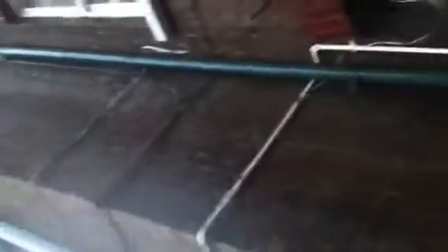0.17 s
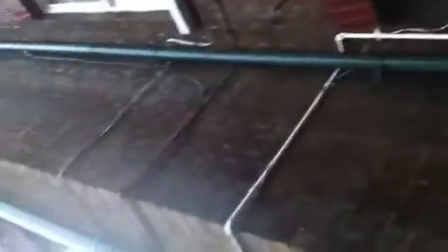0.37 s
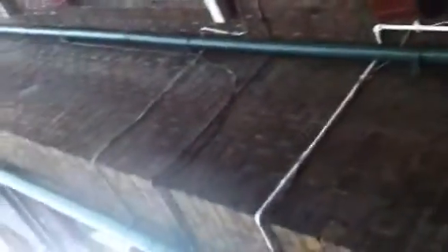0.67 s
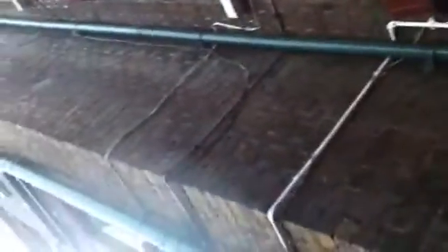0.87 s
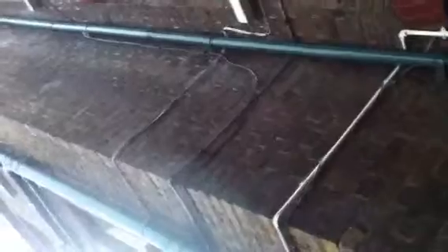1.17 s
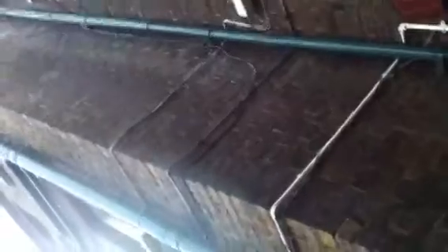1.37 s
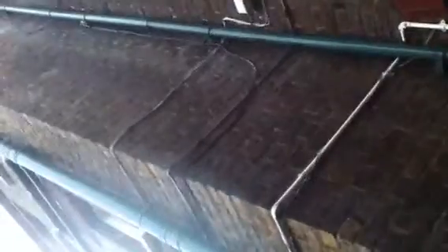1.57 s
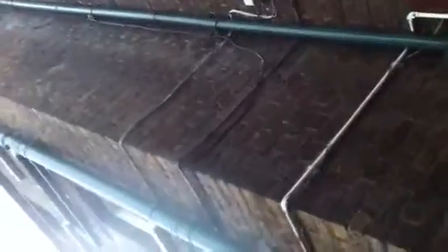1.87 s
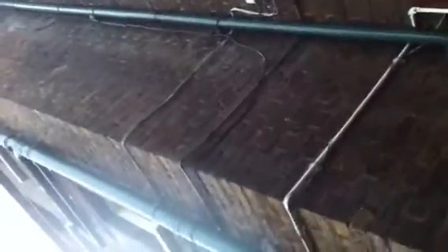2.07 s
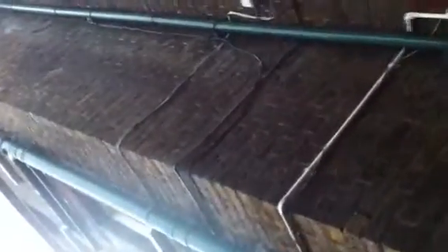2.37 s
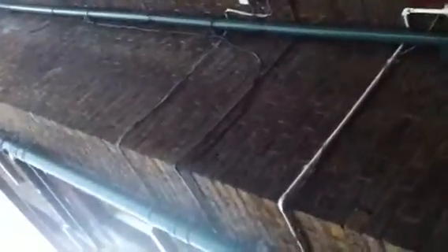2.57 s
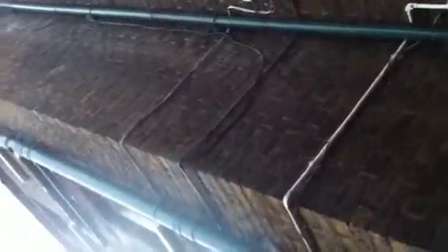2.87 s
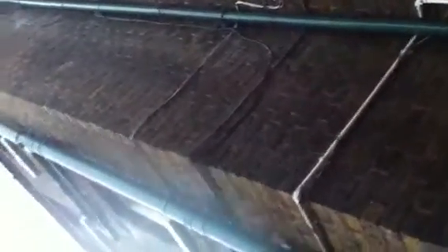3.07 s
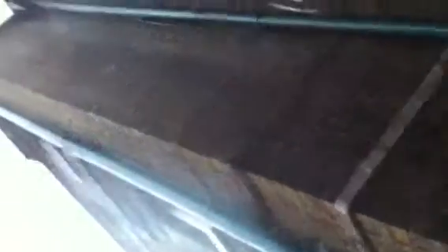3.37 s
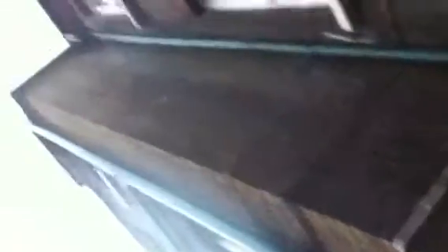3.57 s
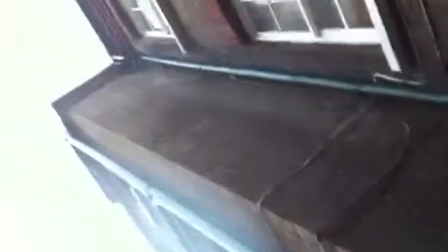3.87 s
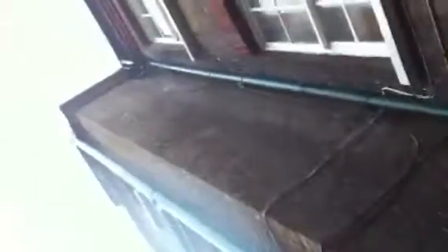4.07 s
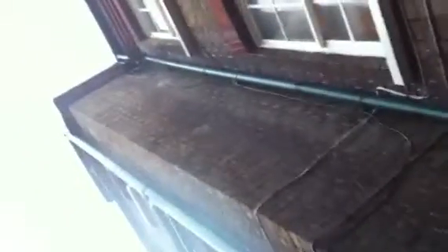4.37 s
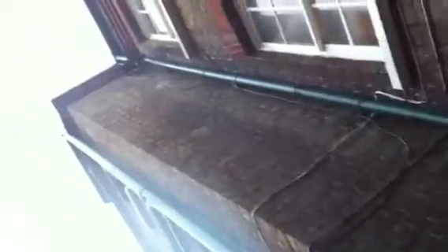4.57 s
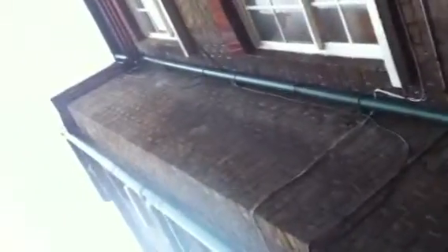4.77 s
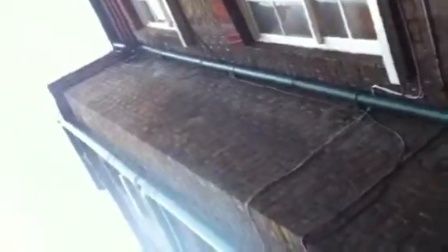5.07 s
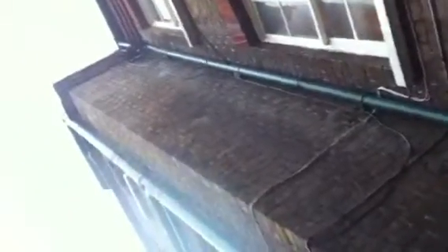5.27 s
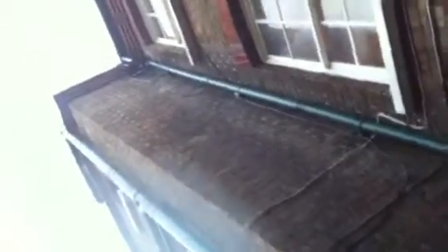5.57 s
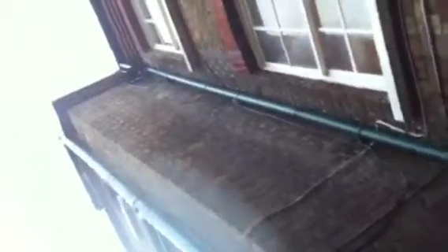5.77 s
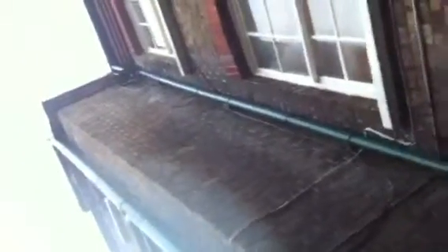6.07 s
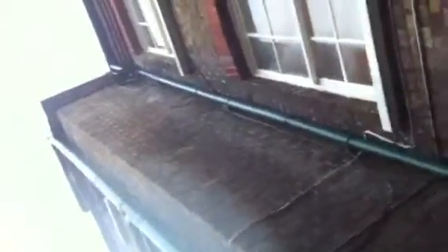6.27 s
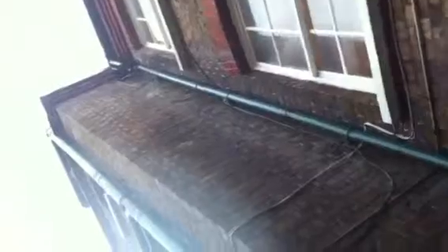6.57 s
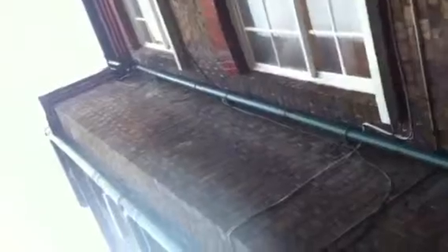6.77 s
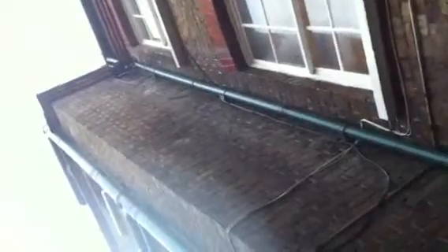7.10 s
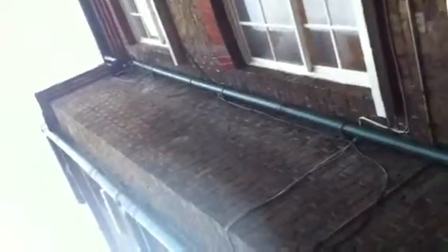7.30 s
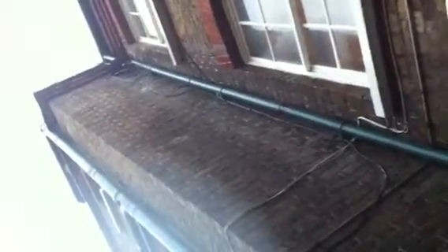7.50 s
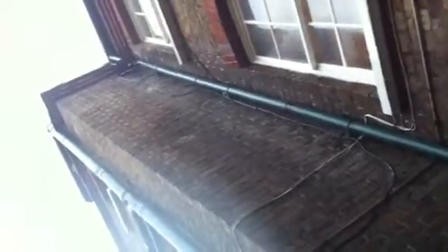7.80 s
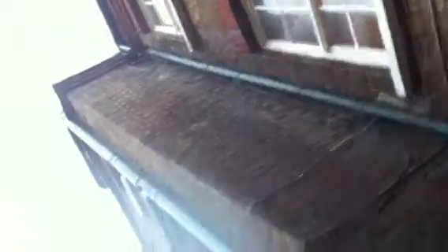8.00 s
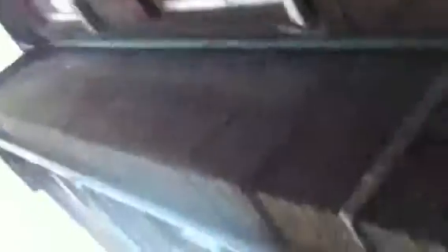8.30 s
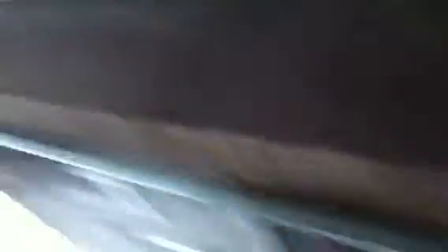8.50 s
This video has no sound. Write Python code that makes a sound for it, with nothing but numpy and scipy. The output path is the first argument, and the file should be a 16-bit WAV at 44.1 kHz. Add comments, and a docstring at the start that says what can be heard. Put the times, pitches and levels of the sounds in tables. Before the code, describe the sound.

Outdoors beside a brick wall, overflowing rainwater slaps down in irregular, crackling splashes over a steady patter of rain. Heavy drops tap on something hollow close by, among small stray ticks. About halfway through, a finger bumps the microphone and covers it, and the splashing, tapping and rain carry on dull and boxy to the end.

```python
"""Beside a brick wall: rainwater spills from a blocked hopper; each gob slaps down and bursts into spray.
Heavy drops tap on something hollow close by, over stray ticks and a steady patter of rain.
About halfway, a finger bumps onto the microphone port and stays, leaving the water dull and boxy."""
import sys
import numpy as np
from scipy import signal
from scipy.fft import rfft, irfft, next_fast_len
from scipy.io import wavfile
from scipy.ndimage import map_coordinates

SR = 44100
rng = np.random.default_rng(int(sys.argv[2]) if len(sys.argv) > 2 else 0)


def master(y):
    """Save y as 16-bit WAV."""
    cut = np.clip(np.atleast_2d(y).T, -1, 1)
    pcm = np.round(cut * 32767)  # scale
    wavfile.write(sys.argv[1], SR, pcm.astype(np.int16))


N = 381003

# rain strength: time_s, patter_db, fizz_db
RAIN_LEVELS = [(0, -46, -52), (1.7, -43, -46.5), (2.5, -49, -51), (3.0, -44, -49), (3.9, -46.5, -51),
               (4.06, -54, -70.5), (5.1, -52, -46), (7.3, -50.5, -42.5), (8.64, -50, -44)]
# spectrum of bursting spray: freq_hz, gain_db
SPRAY_SPECTRUM = [(300, -21), (1200, -0.5), (2300, 3.5), (3100, -6), (4200, 6.5), (4700, 5), (5700, 6.5),
                  (7300, -3.5), (9200, 2), (11200, -7), (13500, -1), (16000, -13.5)]
# spectrum of fine droplets landing: freq_hz, gain_db
FIZZ_SPECTRUM = [(800, -20), (2200, -2), (3100, -5.5), (5500, 3), (7300, -2.5), (9000, 0), (11200, -8.5),
                 (13500, -3), (16000, -22.5)]


def gobs(small_count=24, small_db=-42, small_spread_db=2, small_t60_s=.08):
    """Gobs at set moments plus further ones at random: start_s, level_db, slap_db, spray_t60_s."""
    # gobs landing at set moments, loud and faint: start_s, level_db, spray_t60_s
    timed = [(0.026, -41, 0.11), (0.047, -36.5, 0.091), (0.138, -27, 0.041), (0.155, -21, 0.074),
             (0.245, -31.5, 0.088), (0.264, -26, 0.042), (0.383, -38.5, 0.047), (0.396, -36, 0.056),
             (0.422, -33.5, 0.078), (0.570, -25.5, 0.11), (0.623, -33.5, 0.061), (0.699, -28, 0.037),
             (0.793, -35.5, 0.11), (0.842, -21, 0.085), (0.930, -32, 0.095), (1.011, -30, 0.11),
             (1.124, -33.5, 0.027), (1.168, -40, 0.14), (1.298, -43, 0.057), (1.324, -39.5, 0.04),
             (1.348, -36.5, .05), (1.438, -41.5, 0.12), (1.498, -36.5, 0.11), (1.626, -30, 0.16),
             (1.715, -35.5, 0.081), (1.873, -36.5, 0.026), (1.985, -36, 0.076), (2.084, -33, 0.13),
             (2.105, -49, 0.089), (2.143, -41.5, .05), (2.255, -29, 0.1), (2.328, -35.5, 0.086),
             (2.365, -36.5, 0.032), (2.601, -41, 0.2), (2.648, -31, 0.068), (2.725, -29, 0.021),
             (2.784, -33.5, 0.065), (2.882, -40.5, 0.2), (2.897, -37, .05), (3.025, -42, 0.031),
             (3.108, -26.5, 0.057), (3.197, -38, 0.12), (3.250, -28.5, 0.044), (3.315, -38, 0.1),
             (3.373, -35.5, 0.037), (3.442, -41, 0.11), (3.492, -32, 0.059), (3.518, -32.5, 0.036),
             (3.589, -30, 0.051), (3.622, -30.5, 0.063), (3.681, -41.5, 0.18), (3.814, -36.5, 0.15),
             (4.165, -43, .12), (4.253, -45.5, 0.14), (4.820, -45.5, 0.17), (5.156, -34.5, 0.052),
             (5.443, -46.5, 0.15), (5.521, -32.5, 0.051), (5.599, -32, 0.057), (5.836, -38, 0.041),
             (6.057, -40, .09), (6.223, -44.5, .13), (6.306, -34.5, 0.043), (6.600, -35, 0.1),
             (6.674, -39, 0.16), (7.043, -34, 0.092), (7.209, -30, 0.073), (7.289, -27, 0.065),
             (7.398, -29.5, 0.043), (7.559, -36.5, .04), (7.734, -45.5, .1), (8.017, -35.5, 0.095),
             (8.117, -26.5, 0.012), (8.194, -39, 0.12), (8.372, -36, 0.13), (8.433, -38.5, 0.1),
             (8.485, -41, 0.11)]
    when, strength = rng.random((small_count, 2)).T
    levels_db = small_db + small_spread_db * (2 * strength - 1)
    small = np.c_[when * N / SR, levels_db, np.full(small_count, small_t60_s)]
    start_s, level_db, t60_s = np.vstack([timed, small]).T
    # harder landings and longer, looser gobs slap louder
    typical_db, typical_t60_s, typical_slap_db = -34, 0.066, -43
    slap_db = typical_slap_db + 0.71 * (level_db - typical_db) + 7.5 * np.log2(t60_s / typical_t60_s)
    return np.c_[start_s, level_db, slap_db, t60_s]


def splats(click_db=10, spray_db=4, crack_db=1, crack_t60_s=0.003,
           slap_gain_db=1.5, slap_t60_s=0.29, fallback_db=-15, fallback_t60_s=0.49):
    """Each gob cracks, slaps down and bursts; its droplets fall back for a moment."""
    # spectrum of the slap: freq_hz, gain_db
    slap_spectrum = [(25, -18.5), (70, -17.5), (140, -3), (240, -13), (310, 3.5), (380, -5), (620, -4),
                     (900, -4), (1500, -1), (2200, -3), (3100, -11.5), (6000, -38)]
    t = np.arange(SR // 4) / SR
    bursts, fallback_power, slap_power = np.zeros((3, N))
    click = response(SPRAY_SPECTRUM)
    click /= np.abs(click).max()
    for start_s, level_db, slap_db, t60_s in gobs():
        decay = amp(spray_db) * fade(t, t60_s) + amp(crack_db) * fade(t, crack_t60_s)
        envelope = amp(level_db) * rise(t, 0.00084) * decay
        add(bursts, start_s, envelope * spray(bright_db=3.5, size=len(t)))
        add(bursts, start_s + .0005, amp(level_db + click_db) * click)  # the gob's front strikes
        fallback = amp(level_db + fallback_db) * rise(t, 0.0075) * fade(t, fallback_t60_s)
        slap = amp(slap_db + slap_gain_db) * rise(t, 0.0055) * fade(t, slap_t60_s)
        add(fallback_power, start_s, fallback ** 2)
        add(slap_power, start_s, slap ** 2)
    body = unit(droplets(slap_spectrum, per_s=3000, spread_db=4) + amp(-9) * bubbles())
    fizz = droplets(FIZZ_SPECTRUM, per_s=1800, spread_db=2.5)
    return bursts + np.sqrt(fallback_power) * fizz + np.sqrt(slap_power) * body


def spray(bright_db, size, vary_db=2, wall_gain=.5, clump_db=3.33, clump_s=0.0021):
    """One landing's spray: finer droplets are brighter; each spot has its own colour and wall echo."""
    hz, db = np.transpose(SPRAY_SPECTRUM)
    tilt_db = bright_db * np.clip(np.log2(hz / 7000), -1, 1)
    db = db + tilt_db + vary_db * rng.standard_normal(len(hz))
    direct = droplets(np.c_[hz, db], per_s=6400, spread_db=3, size=size)
    echo_s = rng.uniform(.001, 0.0045)
    with_wall = unit(direct + wall_gain * np.roll(direct, int(echo_s * SR)))
    # the leading drop hits firmly, the rest arrive in clumps
    clumps = np.r_[1, np.clip(rng.standard_normal(150), -1.5, 1.5)]
    strength = np.interp(np.arange(size) / SR / clump_s, np.arange(len(clumps)), clumps)
    return with_wall * amp(clump_db * strength)


def drops(light_count=12, light_db=-37, light_spread_db=3, light_hz=1430, range_oct=.15):
    """Drops at set moments plus further ones at random, often faint: start_s, level_db, pitch_hz."""
    # drops on the hollow surface at set moments, loud and faint: start_s, level_db, pitch_hz
    timed_drops = [(0.489, -24.5, 2280), (0.522, -13, 1380), (0.879, -23.5, 1370), (1.211, -14.5, 1376),
                   (1.6621, -5, 1387), (1.742, -23.5, 1530), (1.917, -24.5, 1460), (2.006, -20.5, 1370),
                   (2.7154, -20, 1960), (2.726, -12.5, 1410), (2.760, -22, 1630), (2.963, -21.5, 1325),
                   (3.0875, -24, 1480), (3.108, -5, 1450), (3.1495, -18, 1800), (3.529, -26.5, 1470),
                   (4.437, -44, 1430), (4.9115, -19, 1417), (4.945, -30.5, 1400), (5.012, -28.5, 1450),
                   (5.068, -23.5, 1410), (5.2244, -27.5, 1380), (5.444, -29, 1360), (5.501, -26, 1390),
                   (5.836, -20.5, 1376), (6.306, -24.5, 1510), (6.3413, -25, 1380), (6.383, -25, 1410),
                   (6.4114, -32, 1380), (6.532, -21.5, 1400), (6.884, -21.5, 1393), (7.22, -24.5, 1350),
                   (7.282, -28.5, 1410), (7.313, -18.5, 1407), (7.748, -27, 1396), (7.806, -33, 1430),
                   (8.117, -15.5, 1445), (8.1868, -18, 1447), (8.5966, -20.5, 1410)]
    when, strength, pitch = rng.random((light_count, 3)).T
    level_db = light_db + light_spread_db * (2 * strength - 1)
    pitch_hz = light_hz * 2 ** (range_oct * (pitch - .5))
    return np.vstack([timed_drops, np.c_[when * N / SR, level_db, pitch_hz]])


def taps(swell_s=0.0011, rebound_s=.0029, rebound_db=-7.5, rebound_loss_db=2, shell_db=-29,
         snap_db=6, spray_db=-3, splatter_db=-26.5, burst_db=-13):
    """A drop dents the surface with a wet snap; it rebounds and rings faintly under the splatter."""
    # modes of the hollow surface: freq_hz, level_db, t60_s
    shell_modes = [(1226, 0.5, .12), (1330, -2, 0.09), (1402, 4, 0.15), (1480, -3, 0.17), (1570, 0, 0.1),
                   (1904, 5, 0.13), (2010, -8.5, 0.15), (1870, -20.5, .13)]
    # spectrum of splatter on it: freq_hz, gain_db
    splatter_spectrum = [(500, -34.5), (850, -16.5), (1100, 0.5), (1400, 2.5), (1700, 0.5), (2050, 5),
                         (2600, -21.5), (4000, -32.5)]
    t = np.arange(SR // 5) / SR
    track, splatter = np.zeros((2, N))
    for start_s, level_db, pitch_hz in drops():
        add(track, start_s - .0007, amp(level_db) * blip(pitch_hz, swell_s))
        for k, (late, strength, detune) in enumerate(scatter((3, 3)), 1):
            bounce_db = level_db + rebound_db - rebound_loss_db * k + 2 * strength
            bounce = blip(pitch_hz * (0.92 + 0.053 * detune), swell_s * 0.78)
            add(track, start_s + k * rebound_s + .0005 * late, amp(bounce_db) * bounce)
        ring = rise(t, .002) * ringing(shell_modes, t, vary_db=1)
        add(track, start_s, amp(level_db + shell_db) * ring)
        wet_db = -42 + .55 * (level_db + 17.5)  # grows more slowly than the tap
        wet = rise(t, 0.00026) * (amp(snap_db) * fade(t, 0.05) + amp(spray_db) * fade(t, .08))
        add(track, start_s - .0005, amp(wet_db) * wet * spray(bright_db=-4, size=len(t)))
        decay = amp(splatter_db) * fade(t, 0.36) + amp(burst_db) * fade(t, 0.065)
        add(splatter, start_s, amp(level_db) * rise(t, 0.0015) * decay)
    return track + splatter * droplets(splatter_spectrum, per_s=1800, spread_db=3)


def blip(hz, swell_s, sag=.18):
    """One flex of the surface: a few cycles swell, sag in pitch and die."""
    t = np.arange(SR // 50) / SR
    pitch_hz = hz * (1 + sag * (.5 - rise(t, 3 * swell_s)))
    envelope = np.exp(-(t / swell_s - 2) ** 2 / 2) * rise(t, swell_s / 4)
    return envelope * np.sin(2 * np.pi * np.cumsum(pitch_hz) / SR)


def finger(knock_db=4, rub_db=-6, rub_t60_s=0.0295, push_db=-12, push_s=0.0024):
    """Soft blows push air into the port and ring the case while skin scuffs over it."""
    # finger landing and shifting: start_s, level_db
    bumps = [(3.9395, -5.5), (3.959, -23), (3.999, -24), (4.099, -34), (4.524, -43), (4.599, -34),
             (4.643, -38.5), (5.458, -37.5)]
    # modes of the case: freq_hz, level_db, t60_s
    case_modes = [(92, -30, 0.029), (145, -6, 0.064), (233, -5.5, 0.022), (324, -1, 0.032),
                  (450, -2, 0.027), (605, -9, 0.04), (730, -15, 0.045), (878, -2, 0.023),
                  (1127, -10, 0.0235)]
    # spectrum of rubbing skin: freq_hz, gain_db
    skin = [(25, -31.0), (100, 6), (400, 6.5), (1200, 3.5), (1700, -2), (2200, -5), (2800, -18.5),
            (6000, -37.5), (15000, -56)]
    t = np.arange(SR // 4) / SR
    push = amp(push_db) * (1 - t / push_s) * np.exp(-t / push_s) * rise(t, 0.00036)
    knocks, rub = np.zeros((2, N))
    for start_s, level_db in bumps:
        ring = rise(t, 0.0031) * ringing(case_modes, t, vary_db=-1)
        add(knocks, start_s, amp(level_db + knock_db) * (ring + push))
        add(rub, start_s, amp(level_db + rub_db) * rise(t, 0.00065) * fade(t, rub_t60_s))
    return knocks + rub * droplets(skin, per_s=4000, spread_db=2)


def cover_port(x, closed_s=3.942, closing_s=0.01):
    """The finger turns the port into a small leaky cavity: boxy mids, little treble."""
    # response of the covered port: freq_hz, gain_db
    cavity = [(30, -10), (150, 0), (500, 1.5), (800, 6.5), (1100, 8.5), (1450, -1), (2000, -9), (3000, -17),
              (4100, -24), (5300, -26), (7200, -29), (10000, -35.5), (15000, -50)]
    covered = np.clip((np.arange(N) / SR - closed_s) / closing_s + 1, 0, 1)
    return (1 - covered) * x + covered * colour(x, cavity)


def ticks(count=80, boost_db=4, spread_db=3, t60_s=0.026):
    """Stray droplets click nearby at random, louder when the rain patters harder."""
    t = np.arange(SR // 25) / SR
    time_s, patter_db, _ = np.transpose(RAIN_LEVELS)
    track = np.zeros(N)
    for start_s, strength in zip(rng.uniform(0, N / SR, count), scatter(count)):
        level_db = np.interp(start_s, time_s, patter_db) + boost_db + spread_db * strength
        add(track, start_s, amp(level_db) * fade(t, t60_s) * spray(bright_db=6.5, size=len(t)))
    return track


def rain(gain_db=-2, bubble_db=-7):
    """Countless farther drops: a low bubbling patter and a fine fizz that surge with the flow."""
    time_s, *levels_db = np.transpose(RAIN_LEVELS)
    patter_db, fizz_db = [np.interp(np.arange(N) / SR, time_s, db) for db in levels_db]
    surge = wobble(knots_per_s=22)
    # spectrum of the patter: freq_hz, gain_db
    patter_spectrum = [(25, -26.5), (70, -16), (130, -4.5), (210, 1), (450, -2), (640, -4.5), (920, -4),
                       (1300, -3), (2100, -3), (3100, -20.5), (6000, -24)]
    patter = droplets(patter_spectrum, per_s=1500, spread_db=2) + amp(bubble_db) * bubbles()
    fizz = droplets(FIZZ_SPECTRUM, per_s=2500, spread_db=4)
    return amp(gain_db) * (amp(patter_db + 2.4 * surge) * patter + amp(fizz_db + 1.8 * surge) * fizz)


def bubbles(count=1300, centre_hz=1100, spread_oct=.55, t60_cycles=26, spread_db=3, glide=.06):
    """Air trapped in the puddle rings briefly, each bubble rising a little in pitch; rms 1."""
    t = np.arange(SR // 28) / SR
    track = np.zeros(N)
    for start_s, (detune, strength) in zip(rng.uniform(0, N / SR, count), scatter((count, 2))):
        hz = centre_hz * 2 ** (spread_oct * detune)
        t60_s = t60_cycles / hz
        phase = 2 * np.pi * hz * t * (1 + glide * t / t60_s / 2)
        envelope = amp(spread_db * strength) * rise(t, 0.00057) * fade(t, t60_s)
        add(track, start_s, envelope * np.sin(phase))
    return unit(track)


def droplets(spectrum, per_s, spread_db, size=N):
    """Tiny uneven impacts at random moments, coloured by a spectrum; rms 1."""
    lands = np.flatnonzero(rng.random(size) < per_s / SR)
    strength, polarity = rng.standard_normal((2, size))[:, lands]
    impacts = np.zeros(size)
    impacts[lands] = amp(spread_db * np.clip(strength, -2, 2)) * np.sign(polarity)
    return unit(colour(impacts, spectrum))


def ringing(modes, t, vary_db):
    """Damped modes, struck at new strengths each time."""
    strike_db = vary_db * rng.uniform(-0.89, 1, len(modes))
    return sum((-1) ** k * amp(db + strike_db[k]) * fade(t, t60_s) * np.sin(2 * np.pi * hz * t)
               for k, (hz, db, t60_s) in enumerate(modes))


def response(spectrum, size=2048):
    """Minimum-phase impulse response from rows of freq_hz, gain_db."""
    hz, db = np.transpose(spectrum)
    gain = amp(np.interp(np.log(np.fft.rfftfreq(size, 1 / SR) + 1), np.log(hz), db))
    cepstrum = irfft(np.log(gain))
    cepstrum[1:size // 2] *= 2
    cepstrum[size // 2 + 1:] = 0
    return irfft(np.exp(rfft(cepstrum)))


def colour(x, spectrum):
    """Filter x by a spectrum."""
    return signal.fftconvolve(x, response(spectrum))[:len(x)]


def wobble(knots_per_s):
    """Smooth random curve."""
    knots = rng.standard_normal(int(N * knots_per_s / SR) + 4)
    return map_coordinates(knots, [np.arange(N) * knots_per_s / SR])


def scatter(shape):
    """Normal draws clipped at 2 sigma."""
    return np.clip(rng.standard_normal(shape), -2, 2)


def amp(db):
    """Decibels to gain."""
    return 10 ** (np.asarray(db) / 20)


def unit(x):
    """Scale to rms 1."""
    return x / np.sqrt(np.mean(x ** 2) + 1e-20)


def fade(t, t60_s):
    """Exponential decay, 60 dB down at t60_s."""
    return np.exp(-np.log(1000) * t / max(t60_s, 1e-3))


def rise(t, attack_s):
    """Soft onset."""
    return 1 - np.exp(-t / attack_s)


def add(track, start_s, x):
    """Mix x into the track."""
    part = track[max(round(start_s * SR), 0):][:len(x)]
    part += x[:len(part)]


def scene():
    """Water through the open, then covered port, plus the finger's bumps; mono."""
    water = splats() + taps() + ticks() + rain()
    return (cover_port(water) + finger())[None]


def record(dry, hiss_db=-69.5, top_hz=15900):
    """The microphone adds faint hiss and cuts everything above top_hz."""
    # spectrum of microphone hiss: freq_hz, gain_db
    hiss_spectrum = [(100, 0.5), (3000, 3), (6000, 1.5), (11000, -1), (13500, 3), (15500, 2.5)]
    hiss = amp(hiss_db) * unit(colour(rng.standard_normal(N), hiss_spectrum))
    size = next_fast_len(N + SR // 2)
    passband = np.fft.rfftfreq(size, 1 / SR) < top_hz
    return irfft(rfft(dry + hiss, size) * passband, size)[:, :N]


dry = scene()
out = record(dry)
master(out)
```